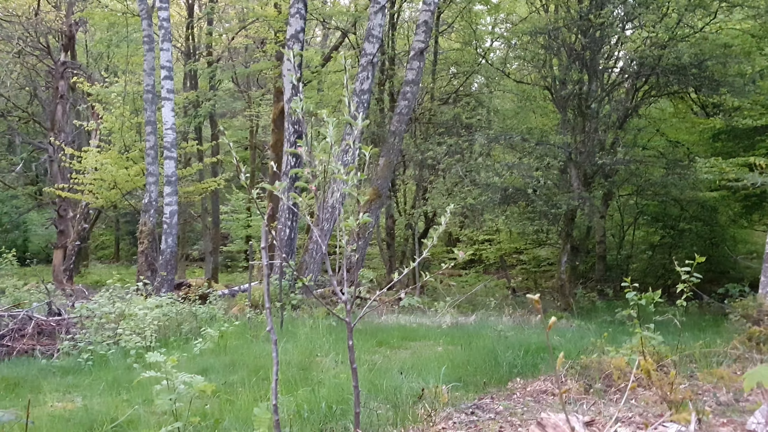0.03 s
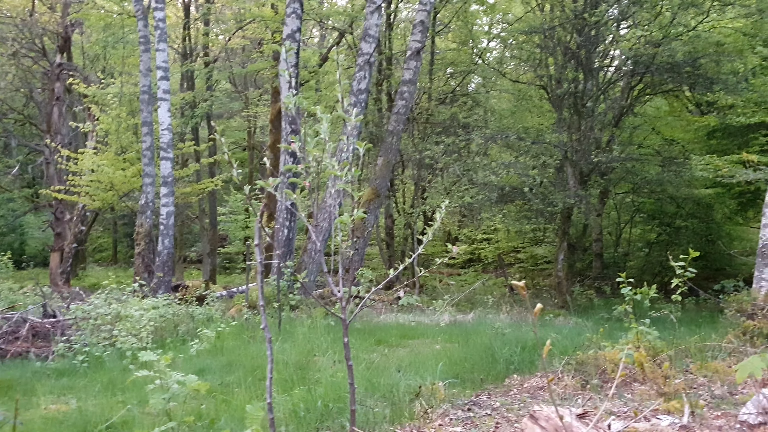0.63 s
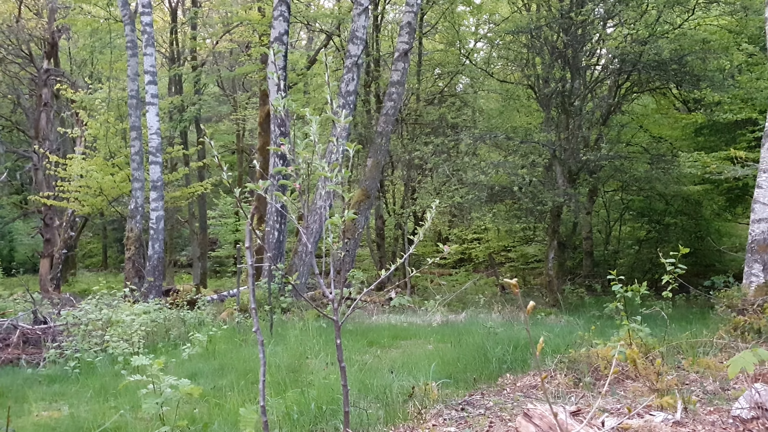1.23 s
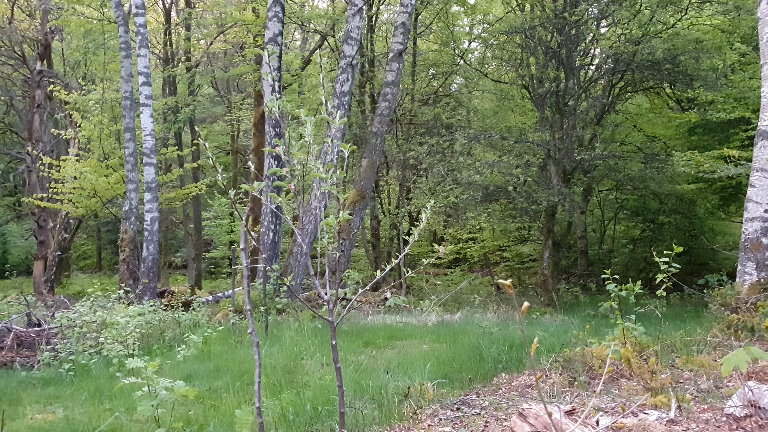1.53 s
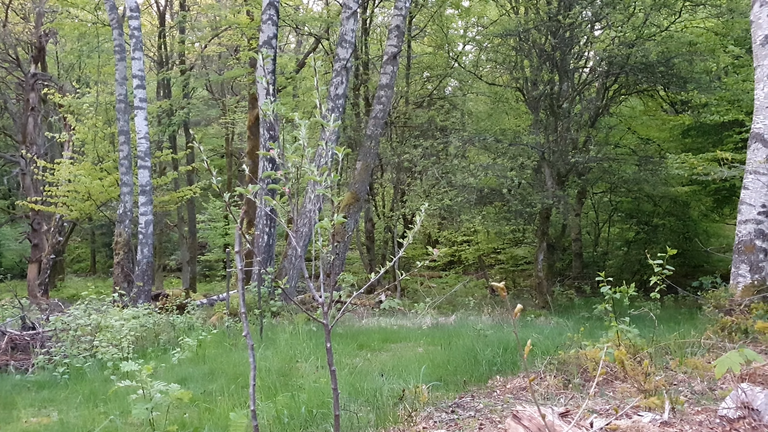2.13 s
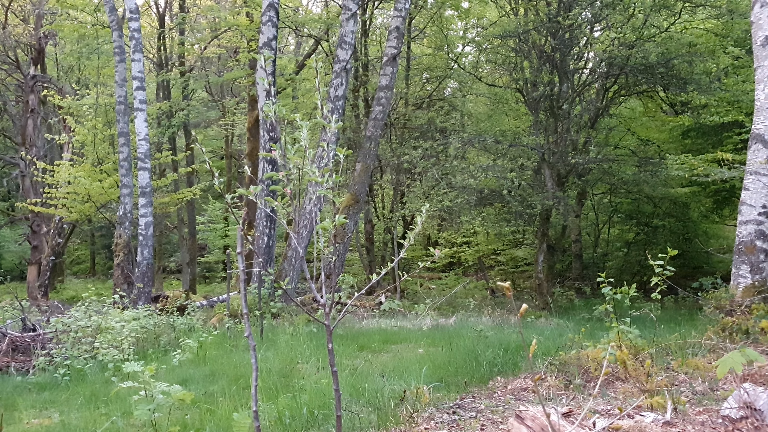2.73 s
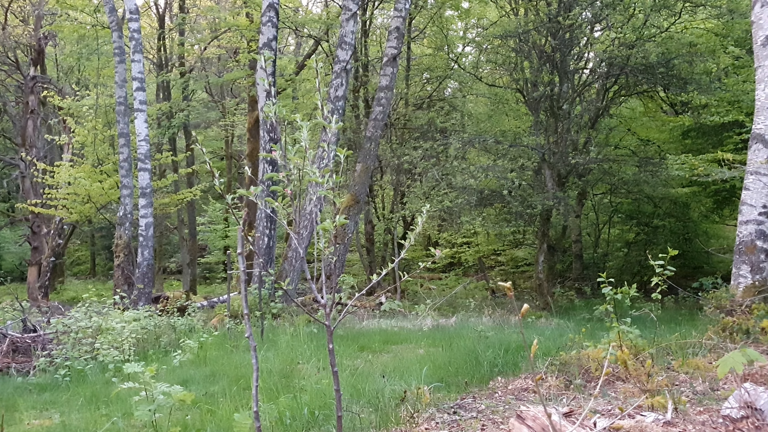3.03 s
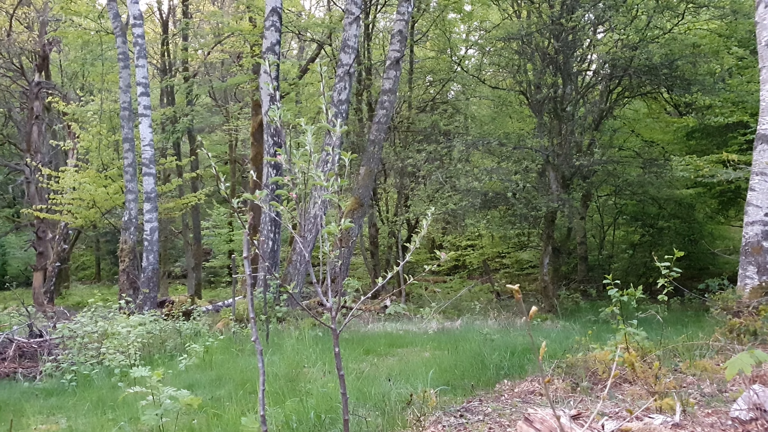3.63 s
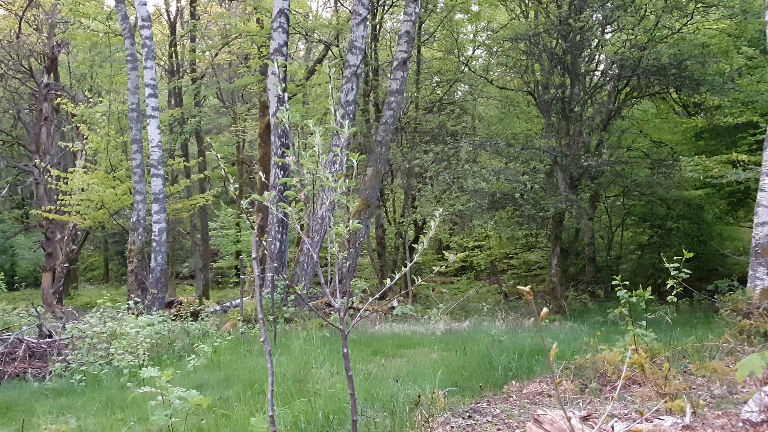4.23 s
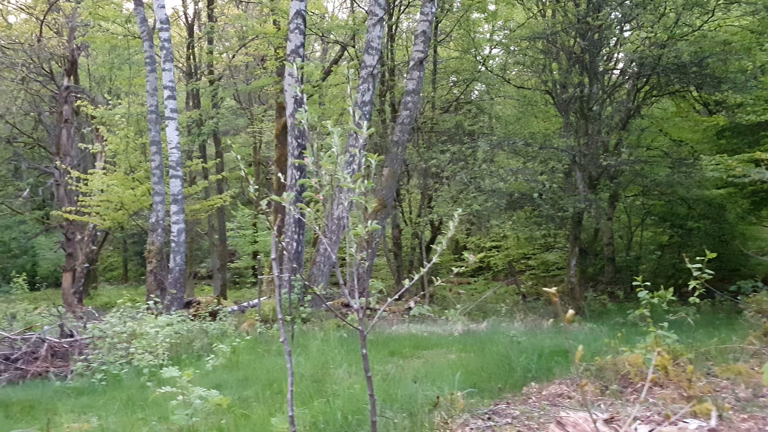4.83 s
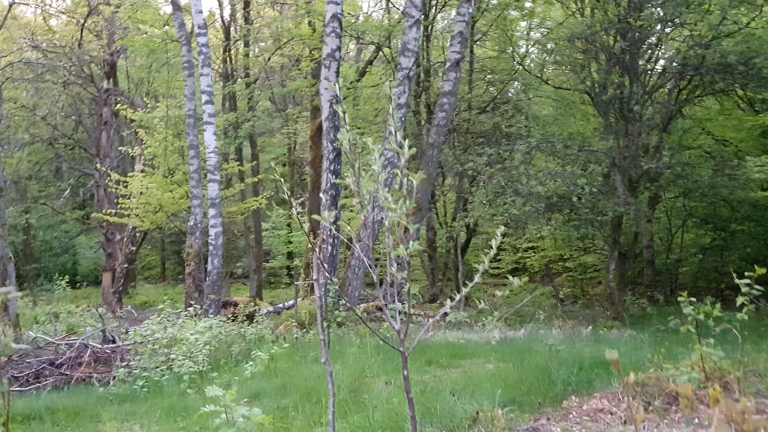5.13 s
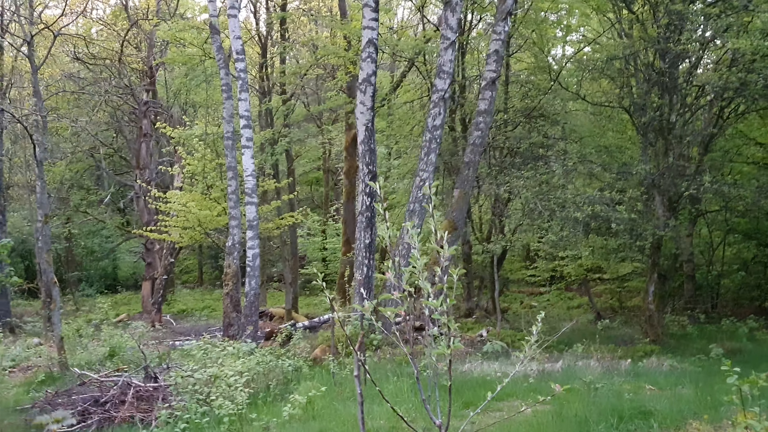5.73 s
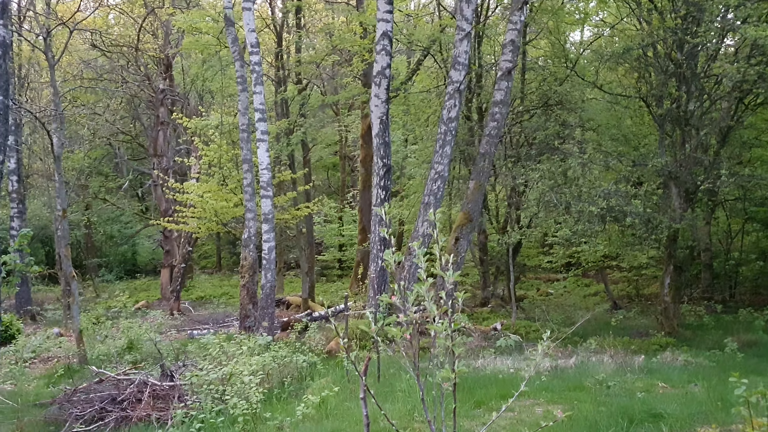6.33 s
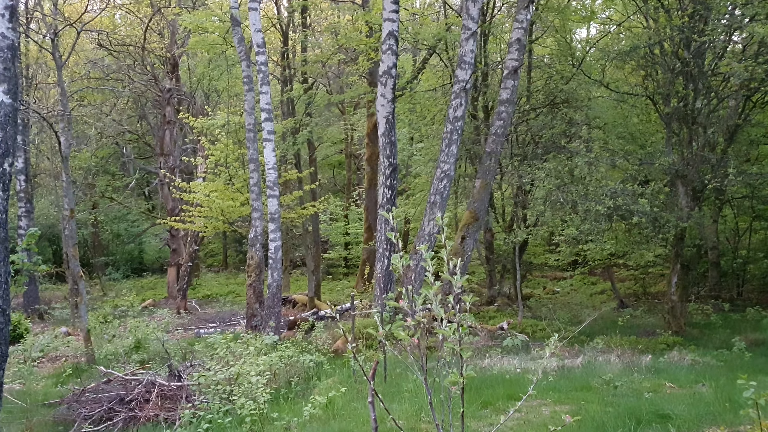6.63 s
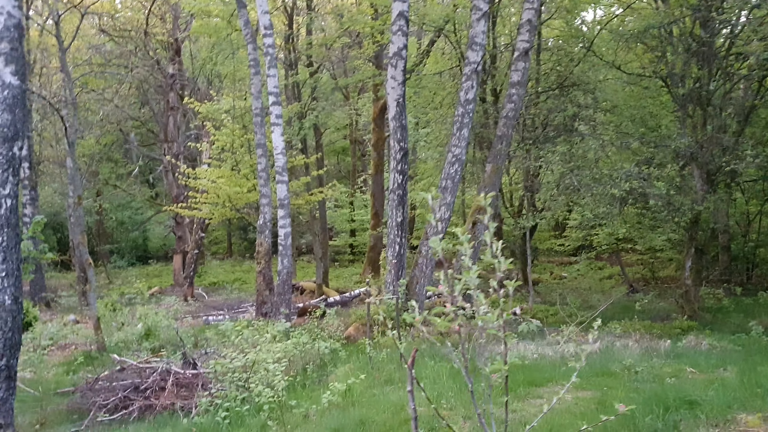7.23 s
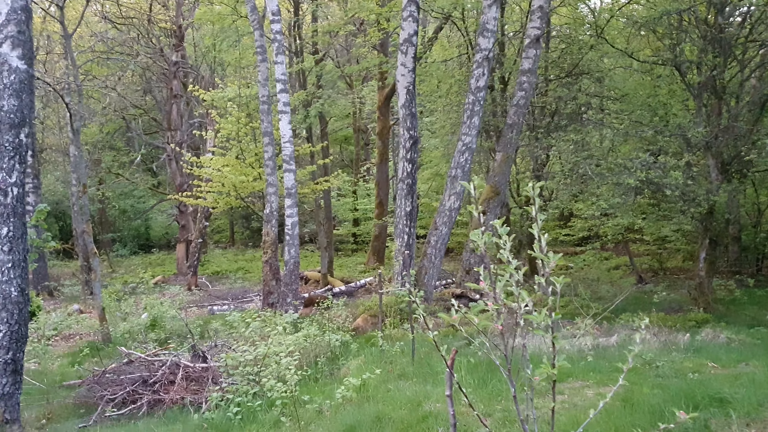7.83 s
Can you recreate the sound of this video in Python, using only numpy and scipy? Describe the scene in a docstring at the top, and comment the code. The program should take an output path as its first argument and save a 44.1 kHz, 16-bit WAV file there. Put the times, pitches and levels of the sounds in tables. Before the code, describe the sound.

Harsh deer barks echo through a still woodland, about two a second, gradually receding. The hand-held camera clicks sharply close by at the start. Behind the barks lie a faint hiss of air, a far low drone and a few soft bird calls. After about five seconds, puffs of wind buffet the microphone, along with light sleeve rustle and tiny handling clicks, while the barking carries on more weakly.

```python
"""A roe deer barks in a spring wood: hoarse loud barks, most followed by a softer one, as it moves off.
Its vocal folds slap and hiss, its throat and mouth shape the sound, and the trunks keep it ringing.
Small birds call over a faint hiss of air and a far, low drone. Close by, a hand-held camera clicks
and sleeves rustle as it is moved, and puffs of wind thump its microphone."""
import sys
import numpy as np
from scipy import signal
from scipy.fft import rfft, irfft, next_fast_len
from scipy.io import wavfile
from scipy.ndimage import map_coordinates

SR = 44100
rng = np.random.default_rng(int(sys.argv[2]) if len(sys.argv) > 2 else 0)


def dump(signal):
    """Clip the signal to [-1, 1] and save it as 16-bit WAV at the path in sys.argv[1]."""
    limited = np.clip(np.atleast_2d(signal).T, -1, 1)
    pcm = np.round(limited * 32767).astype(np.int16)
    wavfile.write(sys.argv[1], SR, pcm)


N = 357210
TOP_HZ = 15780  # the highest sound the camera picks up


def amp(db):
    """Turn decibels into a number to multiply by."""
    return 10 ** (np.asarray(db) / 20)


def unit(x):
    """Scale x to an average strength (rms) of 1."""
    return x / np.sqrt(np.mean(x ** 2) + 1e-20)


def along(points, hz):
    """Read a table of (frequency, value) at hz, giving each octave equal room."""
    freqs, values = np.transpose(points)
    return np.interp(np.log(hz + 1), np.log(freqs + 1), values)


def curves(rows, t):
    """Read a table at the times t: one curve for each column after the first."""
    times, *columns = np.transpose(rows)
    return [np.interp(t, times, column) for column in columns]


def clock(length):
    """The time of each sample over a length in seconds."""
    return np.arange(int(length * SR)) / SR


def wobble(rate, size):
    """A smooth curve through rate random values a second."""
    values = rng.standard_normal(int(size * rate / SR) + 4)
    return map_coordinates(values, [np.arange(size) * rate / SR])


def filtered(x, response):
    """Multiply each frequency in x by response(hz)."""
    size = x.shape[-1]
    padded = next_fast_len(size + 8192)
    hz = np.fft.rfftfreq(padded, 1 / SR)
    return irfft(rfft(x, padded) * response(hz), padded)[..., :size]


def add(track, start, x):
    """Mix x into the track from start seconds on."""
    i = max(0, round(start * SR))
    part = track[..., i:i + x.shape[-1]]
    part += x[..., :part.shape[-1]]


def balance(pan_db):
    """Left and right gains that average 1; a positive pan_db favours the left."""
    gains = amp(np.array([[1], [-1]]) * pan_db / 2)
    return gains / gains.mean(0)


def placed(x, pan_db=0, lag_ms=0):
    """Make x stereo, reaching the left side lag_ms after the right."""
    sides = np.array([[1], [-1]])
    pair = filtered(x, lambda hz: np.exp(-1j * np.pi * hz * sides * lag_ms / 1000))
    return pair * balance(pan_db)


def noise_pair(alike, size):
    """Left and right white noise: unrelated when alike is 0, the same when it is 1."""
    common, opposed = rng.standard_normal((2, size))
    angle = np.arccos(alike) / 2
    return np.cos(angle) * common + np.sin(angle) * np.array([opposed, -opposed])


def rush(colour, alike):
    """Stereo noise of strength 1, its lows and highs set by the colour table."""
    return unit(filtered(noise_pair(alike, N), lambda hz: amp(along(colour, hz))))


def resonance(x, hz, width_hz):
    """Let x ring in a band around hz, which may move."""
    turn = np.exp(2j * np.pi * np.cumsum(hz * np.ones(len(x))) / SR)
    decay = np.exp(-np.pi * width_hz / SR)
    return 2 * np.real(turn * signal.lfilter([1 - decay], [1, -decay], x / turn))


def formant(x, hz, width_hz):
    """The same resonance twice, so less gets through outside its band."""
    return resonance(resonance(x, hz, width_hz), hz, width_hz)


def among_trees(pair, near_db, near_t60, far_db, alike):
    """Direct sound, quick echoes off near trunks and the wood's long answer (t60: time to fade 60 dB)."""
    # leaves and twigs scatter short waves most: f/Hz, gain/dB
    scatter = [(500, -3.5), (1100, -6), (1800, 6), (2650, 7), (6000, 1)]
    # how long the wood rings: f/Hz, t60/s
    ring_times = [(150, 0.86), (550, 1.26), (1100, 1.345), (1800, 0.99), (2600, 0.69), (6000, 1.1),
                  (14000, 0.39)]
    hz, frame_times, spectrum = signal.stft(noise_pair(alike, int(1.5 * SR)), SR, nperseg=256)
    fade = amp(along(scatter, hz)[:, None] - 60 * frame_times / along(ring_times, hz)[:, None])
    far = signal.istft(spectrum * fade, SR, nperseg=256)[1]
    t = np.arange(far.shape[1]) / SR
    far *= 1 - np.exp(-t / 0.013)
    near = noise_pair(alike, len(t)) * amp(-60 * t / near_t60)
    echo = (amp(near_db) * unit(near) + amp(far_db) * unit(far)) / np.sqrt(len(t))
    echo[:, 0] += 1  # the direct sound
    return signal.fftconvolve(pair, echo / np.linalg.norm(echo[0]), axes=1)


def still_air():
    """The faint, steady hiss of the still wood."""
    # lows and highs of the hiss: f/Hz, gain/dB
    colour = [(88, -32), (150, 0), (172, -13), (221, -5), (393, -10.5), (2360, -21), (3600, -20.5),
              (7210, -34), (8250, -22), (9450, -28), (15000, -24)]
    return amp(-80.5) * rush(colour, alike=0.12)


def drone():
    """A low drone from far beyond the wood swells and sinks; a narrow hum in it dies away early."""
    # loudness of the drone: t/s, level/dB
    loudness = [(0.0, -68), (1.46, -66), (1.9, -70), (2.32, -79.5), (2.74, -74.5), (4.23, -69.5),
                (4.42, -81), (5.2, -79.5)]
    # its deep tone: f/Hz, gain/dB
    colour = [(20, -23), (40, -6), (62, 5.5), (85, 1.5), (125, 3), (165, -13), (205, -31), (300, -25.5),
              (600, -53), (1200, -90.5)]
    t = np.arange(N) / SR
    level_db, = curves(loudness, t)
    rumble = amp(level_db + 3 + 3.5 * wobble(8.2, N)) * rush(colour, alike=0.88)
    hum = unit(formant(rng.standard_normal(N), hz=135, width_hz=29))
    hum_db = -70.5 - 23 * np.maximum(t - 1.6, 0)
    return rumble + amp(hum_db) * hum


def songbird():
    """A far bird's soft whistles glide, arch upward and waver a little."""
    # its notes: start/s, length/s, level/dB, pitch/Hz, glide/Hz
    whistles = [(0, 0.073, -74, 2130, -300), (1.01, 0.17, -70.5, 2133, -300), (5.392, 0.065, -77, 2030, -3),
                (5.935, 0.14, -73, 2040, 211), (6.317, 0.25, -81, 2380, 55),
                (6.518, 0.123, -78, 2050, -150), (7.073, 0.18, -71.5, 2370, 98),
                (7.217, 0.086, -74.5, 2954, 205), (7.299, 0.16, -75, 2300, -27.5),
                (7.405, 0.053, -76, 3770, -450), (7.498, 0.16, -81, 2320, -11)]
    out = np.zeros(N)
    for start, length, db, pitch_hz, glide_hz in whistles:
        t = clock(length)
        progress = t / length
        arch_hz = .55 * abs(glide_hz) * np.sin(np.pi * progress)
        hz = (pitch_hz + glide_hz * (progress - .5) + arch_hz) * (1 + .03 * wobble(250, len(t)))
        tone = np.sin(2 * np.pi * np.cumsum(hz) / SR)
        add(out, start, amp(db) * signal.windows.tukey(len(t), .5) * tone)
    return among_trees(placed(out), near_db=-5, near_t60=.13, far_db=-10, alike=.4)[:, :N]


def small_bird():
    """Two quick sliding calls whose low part is rich in overtones."""
    # the shape of one call: t/s, pitch/Hz, level/dB, overtones/dB
    slur = [(0, 4512, 2.5, -29), (.012, 6240, 0, -43), (.026, 5705, 4.5, -23.5), (.031, 4220, -5, -18),
            (.05, 3922, -5.5, -4), (.069, 3800, -6, 1.5), (.077, 5450, 1.5, -28), (.083, 3996, -5, -45)]
    # the calls: start/s, level/dB, pitch ratio
    chirps = [(1.034, -67.5, 1.03), (5.13, -54, 1.0)]
    out = np.zeros((2, N))
    t = clock(slur[-1][0])
    hz, shape_db, overtone_db = curves(slur, t)
    for start, db, ratio in chirps:
        phase = 2 * np.pi * np.cumsum(ratio * hz * (1 + 0.018 * wobble(650, len(t)))) / SR
        overtones = sum(amp(gain_db) * np.sin(k * phase) * (k * hz < SR / 2)
                        for k, gain_db in [(2, -4), (3, 3), (4, -2)])
        tone = np.sin(phase) + amp(overtone_db) * overtones
        call = placed(amp(db + shape_db) * tone * signal.windows.tukey(len(t), .1), pan_db=2)
        add(out, start, among_trees(call, near_db=-1.5, near_t60=.2, far_db=-9, alike=.3))
    return out


def rustle():
    """Sleeves slide and crinkle as the camera moves, with a few distinct strokes."""
    # the hands come to rest: t/s, movement/dB
    settling = [(0.0, -72.5), (0.11, -73.5), (0.53, -83), (1.62, -94.5), (4.58, -94), (4.88, -91)]
    # the hands swing the camera round: t/s, movement/dB
    swinging = [(4.98, -76.5), (5.15, -77.5), (5.21, -74.5), (5.83, -80.5), (6.6, -83), (6.87, -76.5),
                (7.38, -81.5), (7.59, -84.5), (8.1, -81.5)]
    # sliding cloth: f/Hz, gain/dB
    swish_colour = [(300, 1), (1500, 2.5), (3200, -4.5), (4500, -3), (6500, -6), (8000, -15.5),
                    (12000, -16.5)]
    # crinkling cloth: f/Hz, gain/dB
    crinkle_colour = [(4000, -24), (6800, 4.5), (8400, -7.5), (9500, -2.5), (12000, -2.5), (15500, -13)]
    # single sleeve strokes: middle/s, length/s, level/dB, centre/Hz
    strokes = [(5.038, 0.17, -77, 8030), (6.37, 0.16, -83.5, 8500), (6.739, 0.11, -64.5, 5540),
               (6.74, 0.33, -70.5, 10050), (7.08, 0.26, -78.5, 7800), (7.318, 0.2, -76, 13200),
               (7.9, 0.24, -73.5, 5460), (7.89, 0.15, -72.5, 14300)]
    brisk_db, stroke_octaves = -83, 0.36  # a brisk movement; the width of a stroke's band
    motion_db = curves([*settling, *swinging], np.arange(N) / SR)[0] - brisk_db
    swish = amp(6.5 + 0.97 * motion_db + 0.92 * wobble(32, N)) * rush(swish_colour, alike=0.19)
    crinkle = amp(-4 + 1.06 * motion_db + 1.5 * wobble(220, N)) * rush(crinkle_colour, alike=0.2)
    out = amp(brisk_db) * (swish + crinkle)
    for middle, length, db, centre_hz in strokes:
        size = int(length * SR)
        fibres = noise_pair(.2, size) * amp(3.5 * wobble(350, size))
        stroke = filtered(
            fibres, lambda hz: np.exp(-.5 * (np.log2((hz + 1) / centre_hz) / stroke_octaves) ** 2))
        add(out, middle - length / 2, amp(db) * np.hanning(size) * unit(stroke))
    return out


def camera_clicks():
    """Sharp snaps next to the left microphone ring the camera's case for a few milliseconds."""
    # the clicks: start/s, level/dB, brightness/(dB per octave)
    clicks = [(0.214, -30.5, -3), (0.7613, -57.5, -3), (6.608, -71, 14), (6.6751, -63.5, 6.5),
              (7.0305, -68, 5), (7.1555, -72, 13.5), (7.294, -72.5, 9.5)]
    # the tones of the case: f/Hz, level/dB, t60/s
    case_tones = [(2943, -17.5, 0.0059), (3705, 0, 0.0057), (4280, -3.5, 0.0065), (5950, -7, 0.015),
                  (7040, -20, 0.003), (8200, -26, 0.0018), (10700, -5, 0.012), (12000, -6, 0.0043)]
    # lows and highs of a snap: f/Hz, gain/dB
    colour = [(1000, -14.5), (2400, -6.5), (3300, 1), (6000, 1.5), (8000, -6.5), (10500, -2.5),
              (13000, -7.5), (15700, -13)]
    # the camera's body shades the right microphone: f/Hz, gain/dB
    shadow = [(2500, 0), (4000, -4), (6000, -7.5), (11000, -10), (15000, -6)]
    out, t = np.zeros((2, N)), clock(.04)
    ring = sum(amp(db - 60 * t / t60) * np.sin(2 * np.pi * hz * t) for hz, db, t60 in case_tones)
    for start, db, tilt_db in clicks:
        def tone_gain(hz):
            brightness_db = tilt_db * np.log2(np.maximum(hz, 2000) / 5000)
            return amp(along(colour, hz) + brightness_db) * (hz < TOP_HZ)

        crack = amp(2.5 - 60 * t / .012) * noise_pair(0.33, len(t))
        left, right = filtered(ring + crack, tone_gain)
        snap = np.array([left, filtered(right, lambda hz: amp(along(shadow, hz)))])
        snap *= np.sqrt(0.0025 * SR) / np.linalg.norm(snap.mean(0))  # strength 1 if packed into 2.5 ms
        add(out, start, amp(db) * snap)
    return among_trees(out, near_db=-21, near_t60=.14, far_db=-27, alike=.2)[:, :N]


def eddy(hz, passing_s=.025):
    """One swirl of air pushes on the microphone: a few slowing swings with churning noise on top."""
    t = clock(5 * passing_s)
    age = t / passing_s
    pitch_hz = hz * (.75 + .4 * np.exp(-age)) * np.exp(.14 * wobble(130, len(t)))
    swings = np.sin(2 * np.pi * (np.cumsum(pitch_hz) / SR + rng.random()))
    churn = unit(filtered(rng.standard_normal(len(t)), lambda f: 1 / np.sqrt(1 + (f / (1.5 * hz)) ** 8)))
    swell = age ** 2 * np.exp(-3 * age)
    push = swell * (swings + .45 * churn)
    return push / np.abs(push).max()


def wind():
    """A spell of wind rumbles on the microphone, and single puffs thump each side differently."""
    # strength of the wind: t/s, level/dB
    strength = [(5.25, -67.5), (5.39, -56), (5.53, -50.5), (6.34, -58), (6.69, -51), (6.9, -53), (7.2, -55),
                (7.4, -65.5), (8.1, -74)]
    # its rumble: f/Hz, gain/dB
    colour = [(15, -13), (35, -4.5), (58, -7.5), (90, -5.5), (130, -22.5), (200, -34), (400, -36.5),
              (900, -100)]
    # the puffs: start/s, peak/dB, rough pitch/Hz, left minus right/dB
    puffs = [(0.811, -44, 71, -15), (5.377, -25, 104.4, -42), (5.441, -23, 102.6, -9.5),
             (5.472, -19, 61.6, -34), (5.68, -39, 63, -29), (5.897, -39.5, 86.4, -30),
             (5.968, -31.5, 64.3, 4), (6.035, -28.5, 58, -2), (6.472, -25, 88.5, -31),
             (6.587, -25, 68.5, -7), (6.649, -30.5, 96, 12), (6.704, -31, 55, -4), (6.79, -34.5, 65, -16),
             (7.068, -37, 71.5, 23)]
    t = np.arange(N) / SR
    strength_db, = curves(strength, t)
    fade_in = np.clip((t - 5.2) / 0.12, 0, 1)
    swing_db = 1.5 * np.array([wobble(7.8, N), wobble(12, N)])
    out = fade_in * amp(strength_db + 3.5 + swing_db) * rush(colour, alike=0.7) * balance(pan_db=-1)
    for start, db, hz, pan_db in puffs:
        add(out, start, amp(db) * np.array([eddy(hz), eddy(hz)]) * balance(pan_db))
    # the microphone passes little of the deepest bass
    return filtered(out, lambda hz: hz ** 2 / np.sqrt(hz ** 4 + 38 ** 4))


def vocal_folds(size, breathiness, pitch_hz=204.4, jitter=.12):
    """The vocal folds slap together unevenly, and air hisses after each slap."""
    cycles = np.cumsum(pitch_hz * np.exp(jitter * wobble(120, size))) / SR
    slaps = np.diff(np.floor(cycles), prepend=0) * amp(2.1 * wobble(150, size))
    hiss = rng.standard_normal(size) * np.exp(-1.5 * (cycles % 1))
    return np.sqrt(1 - breathiness) * unit(slaps - slaps.mean()) + np.sqrt(breathiness) * unit(hiss)


def bark(length, db, first_hz, second_hz, rasp_db):
    """One bark: the mouth opens, holds and closes, bending the resonances that shape the voice."""
    # the mouth's movement: share of the bark's length, relative shift of the resonances
    mouth = [(0, -0.11), (.4, 0.035), (.75, -0.017), (1.25, -0.22)]
    # the throat's high resonances, which make the rasp: f/Hz, width/Hz, level/dB
    throat = [(1090, 490, -30), (1673, 83, -22), (1808, 100, -25), (2240, 210, -32), (2560, 53, -35)]
    # what carries through the trees: f/Hz, gain/dB
    carry = [(100, -18.5), (320, 2), (440, -3.5), (600, 7.5), (1100, 2), (2650, -10.5), (3100, -26.5),
             (4200, -27.5), (9000, -29.5)]
    t = clock(length + .2)
    breathiness = np.clip(1.28 - 5.14 * length, 0, 1)  # short barks are all breath
    source = vocal_folds(len(t), breathiness)
    opening, = curves(mouth, t / length)
    force_db = db + 44  # how far above a plain bark: harder ones boom more and rasp brighter

    rise = np.clip(t / (0.023 + .19 * length), 0, 1)
    release_s, release_t60, linger_s = length - 0.014, 0.18, 0.017
    effort = rise * amp(-60 * np.maximum(t - release_s, 0) / release_t60)
    lingering = rise * amp(-60 * np.maximum(t - release_s - linger_s, 0) / release_t60)

    # the first resonance is stronger the deeper it lies, and fills in as the bark swells
    first_db = 54 * np.log2(624.2 / first_hz) - 3.7 * (2.5 - rise)
    first = amp(first_db) * formant(source, first_hz * (1 + opening), width_hz=104.6)
    second = formant(source, second_hz * (1 + 0.41 * opening), width_hz=161)
    # hoarser barks leak more through the nose
    nose = amp(-15 + 7 * breathiness) * resonance(source, 835 * (1 + .5 * opening), width_hz=240)
    chest = amp(-20 + .8 * force_db) * formant(source, hz=141.2, width_hz=83)
    rasp = np.zeros(len(t))
    for hz, width_hz, level_db in throat:
        tilt_db = .5 * force_db * np.log2(hz / 1700)
        rasp += amp(level_db + tilt_db) * resonance(source, hz * (1 + 0.57 * opening), width_hz)
    rasp *= amp(rasp_db) * (1 - 0.33 * np.exp(-t / 0.034))
    voice = effort * (second + nose + chest) + lingering * (first + rasp)
    return filtered(voice, lambda hz: amp(along(carry, hz)))


def deer():
    """The deer barks from a little to the right; as it walks off, its echo gains on the direct sound."""
    # the barks: start/s, length/s, level/dB, first resonance/Hz, second resonance/Hz, rasp/dB
    barks = [(0.139, 0.175, -34.5, 669, 1063, 10), (0.603, 0.047, -45.5, 567, 970, 17.5),
             (1.254, 0.08, -42, 612, 1008, 11.5), (1.756, 0.044, -64.5, 685, 904, -2.5),
             (2.483, 0.17, -37, 616, 1073, 7.5), (2.958, 0.073, -49.5, 565, 937, 7),
             (3.456, 0.14, -40.5, 576.5, 972, 8), (4.038, 0.11, -42, 592, 978, 2),
             (4.647, 0.097, -40, 597, 984, 8), (5.14, 0.071, -53.5, 560, 953, -8),
             (5.67, 0.12, -46, 536, 1045, 12), (6.104, 0.074, -54, 509, 1024, 10.5),
             (6.797, 0.12, -47, 550, 1023, 12.5), (7.571, 0.07, -72, 617, 870, 3),
             (7.953, 0.093, -57, 517, 1010, 13)]
    echo_db_per_s = 1.07
    out = np.zeros((2, N))
    for start, length, db, first_hz, second_hz, rasp_db in barks:
        call = placed(bark(length, db, first_hz, second_hz, rasp_db), lag_ms=.05)
        call = among_trees(call, near_db=-4.5, near_t60=0.39, far_db=-9 + echo_db_per_s * start, alike=.25)
        # strength 1 if bark and echo were packed into the bark's length
        call *= np.sqrt(length * SR) / np.linalg.norm(call, axis=1, keepdims=True)
        add(out, start, amp(db) * call * balance(pan_db=-2.8))
    return out


def scene():
    """The still air, the animals, the far drone and the noises at the camera."""
    return still_air() + deer() + small_bird() + songbird() + drone() + camera_clicks() + wind() + rustle()


def record(dry):
    """The camera keeps nothing above TOP_HZ."""
    return filtered(dry, lambda hz: hz < TOP_HZ)


dry = scene()
out = record(dry)
dump(out)
```